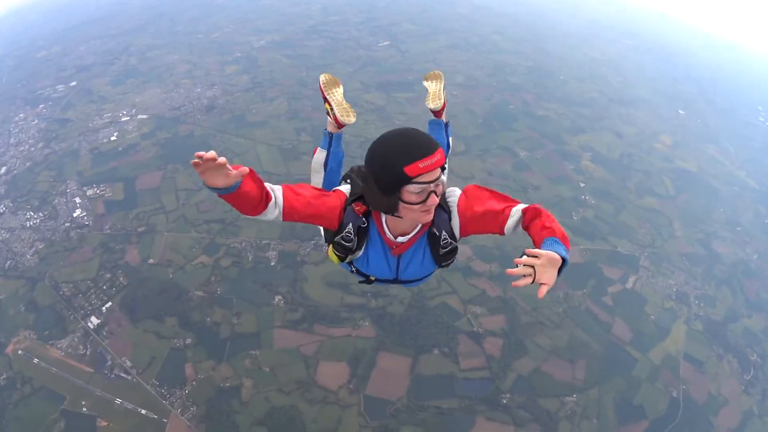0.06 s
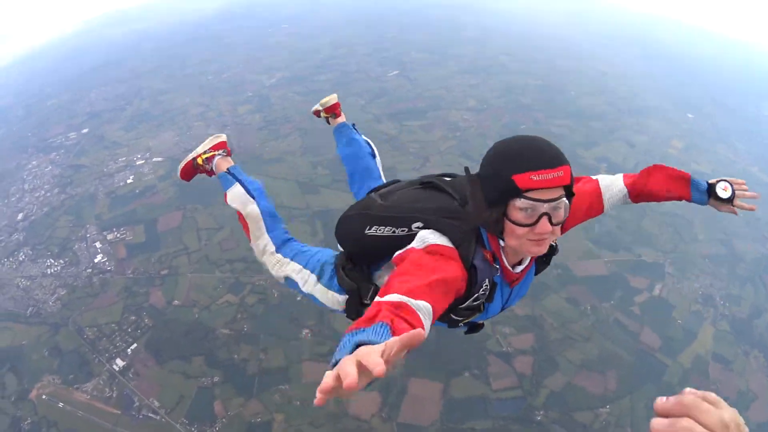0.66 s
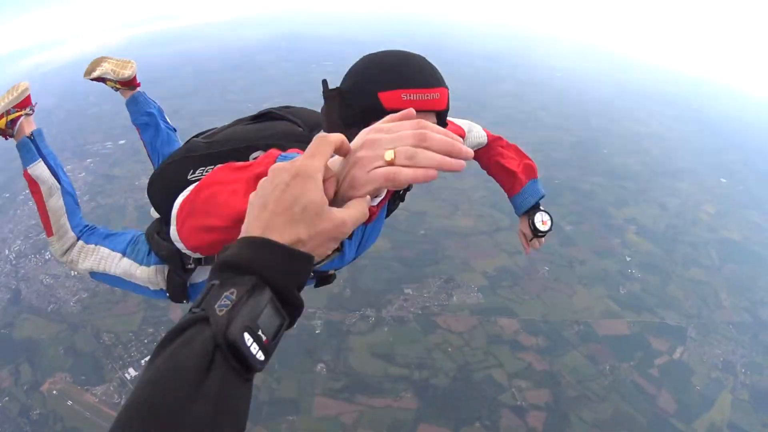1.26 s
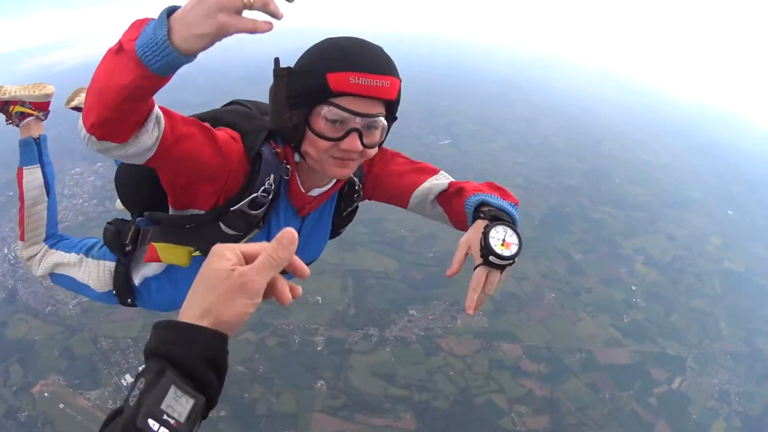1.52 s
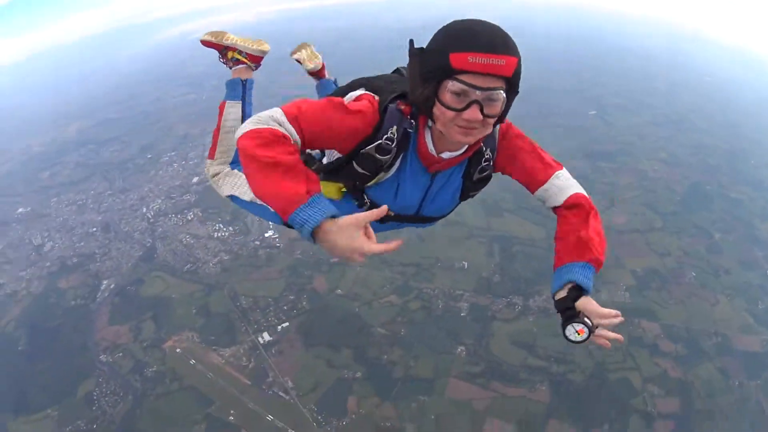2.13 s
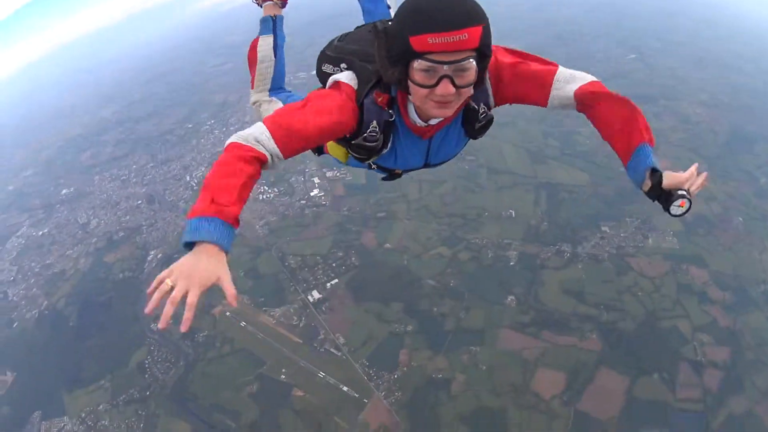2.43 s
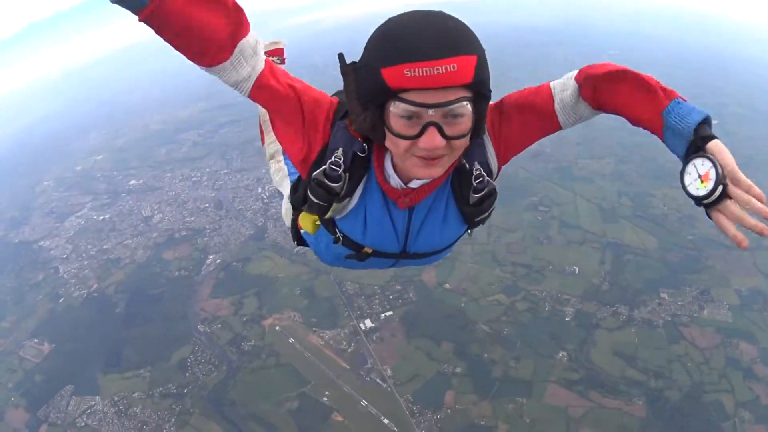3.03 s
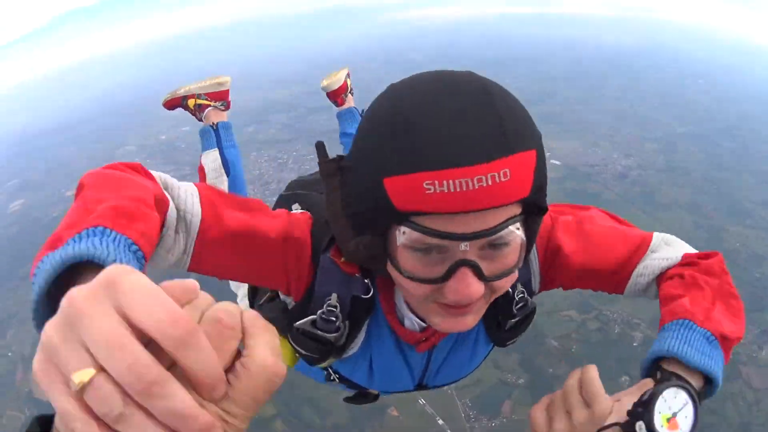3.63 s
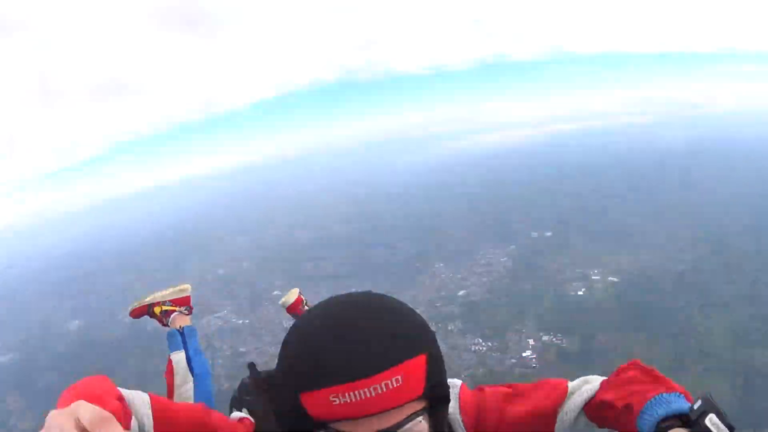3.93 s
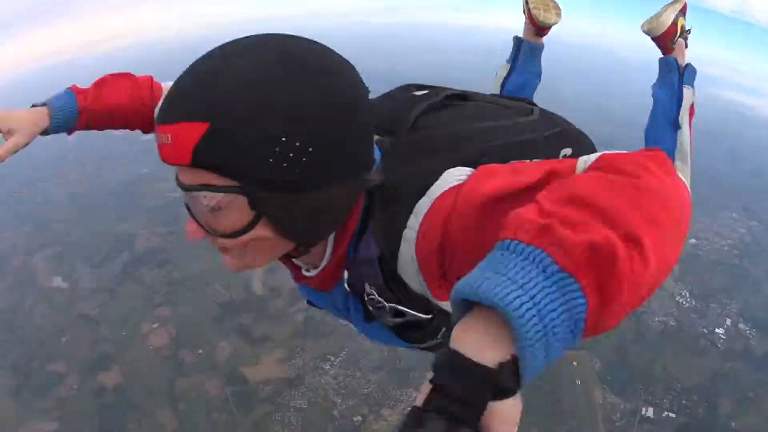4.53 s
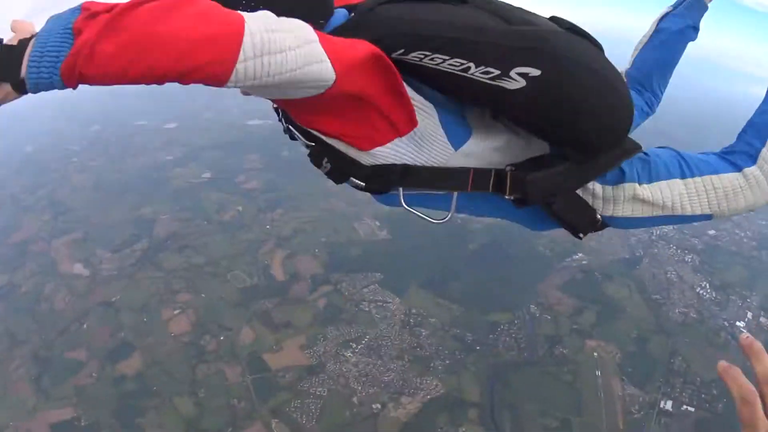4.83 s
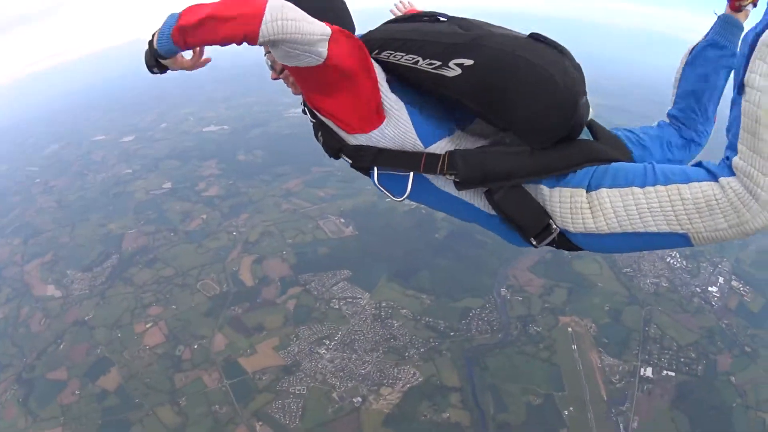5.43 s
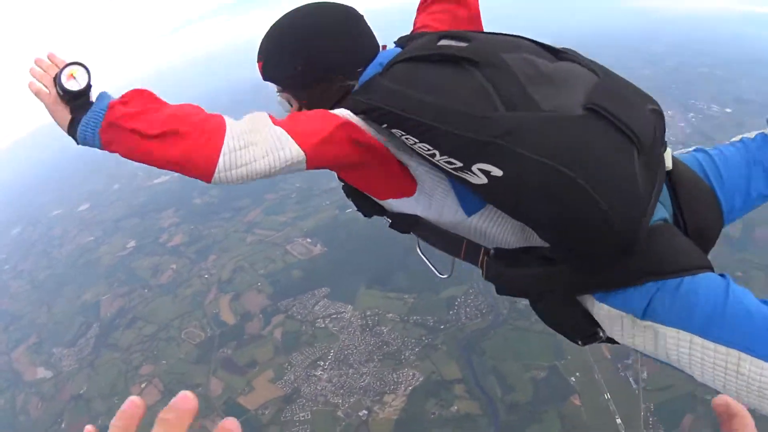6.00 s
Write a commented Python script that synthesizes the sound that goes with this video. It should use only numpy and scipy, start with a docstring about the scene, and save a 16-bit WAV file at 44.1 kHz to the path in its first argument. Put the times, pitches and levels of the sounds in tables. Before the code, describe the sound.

Air tears past a skydiver's microphone in a continuous blustering rush, with low rumble, sizzling hiss and short rasping flares.

```python
"""Freefall wind on a helmet camera

Air tears past two microphone ports. Large eddies roar nearly alike in both, smaller ones bluster.
A fluttering rush rings the hollows of the housing, the largest hollow howls, fine turbulence hisses.
Now and then the rush flares in a rasp or drops into a lull, an eddy buffets a port, or the stream spits."""
import sys
import numpy as np
from scipy import signal
from scipy.fft import rfft, irfft, next_fast_len
from scipy.io import wavfile
from scipy.ndimage import uniform_filter1d, map_coordinates

SR = 44100
rng = np.random.default_rng(int(sys.argv[2]) if len(sys.argv) > 2 else 0)


def put_to_file(sound):
    """Save the sound as 16-bit audio at rate SR, in the file named by the first command-line argument."""
    columns = np.atleast_2d(sound).T  # one column per channel
    safe = np.clip(columns, -1, 1)
    whole_steps = np.round(safe * 32767)
    wavfile.write(sys.argv[1], SR, whole_steps.astype(np.int16))


N = 276066
ATTACHED_DB = -17.5  # weaker flow starts to break up

# Spectra of rush and hiss. Each row: frequency in Hz, dB shared by the ports, dB opposed between them.
RUSH_SPECTRUM = [(200, -26, -28), (477, -7, -12), (830, -8, -8.5), (1530, -4.5, -3.5), (2350, 0.5, -4),
                 (3140, -0.5, -7.5), (3970, -4, -2.5), (4980, -11, -6), (6560, -22.5, -12),
                 (9000, -40.5, -33)]
HISS_SPECTRUM = [(200, -13, -22), (607, -10, -11), (1400, 4.5, -1.5), (2540, -11.5, -1.5),
                 (4020, -1.5, -0.5), (6000, -0.5, 8.5), (8100, -0.5, -1), (10460, 0.5, 8), (10500, 5.5, 11)]
# Flares of the rush; eddies hitting a port. Each row: crest in seconds, level in dB, half length in seconds.
RASP_EVENTS = [(.792, -20, 0.015), (1.127, -17, 0.0054), (1.361, -11.5, 0.0066), (1.391, -10, 0.0021),
               (1.414, -12.5, 0.0098), (1.53, -14.5, 0.0075), (1.584, -20, 0.0033), (1.615, -17.5, 0.0057),
               (1.864, -20, 0.011), (1.918, -15, 0.0039), (2.45, -18.5, 0.022), (2.555, -18, .012),
               (2.745, -15, .02), (3.163, -12, 0.0055), (3.522, -12.5, 0.0051), (3.587, -18.5, 0.0061),
               (3.861, -17, .003), (3.872, -15.5, .003), (4.034, -20, .004), (4.083, -15, 0.0044),
               (4.099, -15, 0.0034), (4.158, -22, .0026), (4.179, -18.5, 0.0059), (4.23, -15, .0039),
               (4.385, -17.5, 0.0074), (4.44, -12.5, 0.0047), (4.461, -20.5, .01), (4.636, -14.5, .0026),
               (5.055, -22, 0.0079), (5.124, -17, 0.0032), (5.236, -16, .0068), (5.489, -17, 0.0046),
               (5.846, -17, 0.012), (5.879, -14, 0.01), (6.138, -10, 0.004)]
BUFFET_EVENTS = [(1.064, -8.5, .0045), (1.21, -16.5, 0.0081), (1.287, -10, 0.0038), (1.408, -21, 0.0059),
                 (2.753, -21, 0.0065), (2.953, -13, .0045), (3.533, -13.5, 0.0033), (3.929, -8, .003),
                 (3.966, -9.5, .0013), (3.987, -15.5, 0.0039), (4.021, -8, 0.0055), (4.436, -17, .0042),
                 (6.15, -10, 0.0051)]


def amp(db):
    """Decibels to gain."""
    return 10 ** (np.asarray(db) / 20)


def curve(rows):
    """(seconds, value) rows joined by straight lines, one value per sample."""
    return np.interp(np.arange(N) / SR, *np.transpose(rows))


def log_interp(points_hz, values, hz):
    """Values joined by straight lines on a log-frequency axis."""
    return np.interp(np.log(hz + 1), np.log(points_hz), values)


def wobble(rate_hz):
    """Smooth random curve with knots at rate_hz."""
    knots = rng.standard_normal(int(N * rate_hz / SR) + 4)
    return map_coordinates(knots, [np.arange(N) * rate_hz / SR])


def bumps(rows):
    """Sum of steep-sided bumps."""
    t, total = np.arange(N) / SR, np.zeros(N)
    for crest_s, height, half_s in rows:
        near = slice(*np.searchsorted(t, [crest_s - 2 * half_s, crest_s + 2 * half_s]))
        total[near] += height * np.exp(-((t[near] - crest_s) / half_s) ** 4)
    return total


def swells(events):
    """Pressure envelope of passing eddies."""
    return bumps([(crest_s, amp(db), half_s) for crest_s, db, half_s in events])


def filtered(x, response):
    """Apply response(hz) to x."""
    size = next_fast_len(N + SR // 2)
    return irfft(rfft(x, size) * response(np.fft.rfftfreq(size, 1 / SR)), size)[..., :N]


def band_limit(hz, top_hz=11130):
    """Gain of the camera's steep low-pass."""
    return 1 / (1 + (hz / top_hz) ** 120)


def turbulence(spectrum, swirl_db=0):
    """Left and right pressure, rms 1: noise that swells with the swirl, coloured by the housing."""
    # Housing resonances. Each row: centre in Hz, width in Hz, shared lift in dB, opposed lift in dB.
    hollows = [(1310, 320, -2, 6.5), (1450, 195, 4.5, -1.5), (1898, 500, 5, -0.5), (2400, 130, 0.5, 3),
               (2720, 170, -0.5, -1.5), (3003, 170, -5.5, 3), (3410, 300, 1.5, 1.5), (3965, 290, 2, 2.5),
               (4530, 400, -1.5, -1), (5170, 1030, 4.5, 3.5)]
    points_hz, *parts_db = np.transpose(spectrum)

    def response(hz):
        slope_db = np.array([log_interp(points_hz, part, hz) for part in parts_db])
        lift_db = sum(np.outer(lifts_db, 1 / (1 + (2 * (hz - centre_hz) / width_hz) ** 2))
                      for centre_hz, width_hz, *lifts_db in hollows)
        return amp(slope_db + lift_db) * band_limit(hz)

    shared, opposed = filtered(rng.standard_normal((2, N)) * amp(swirl_db), response)
    ports = np.array([shared + opposed, shared - opposed])
    return ports / np.sqrt(np.mean(ports ** 2) + 1e-20)


def shreds(rate_hz, life_s, scatter_db, steady_power):
    """Gain of a stream torn into vortices that arrive abruptly and fade; few crackle, many blend."""
    arrivals = rng.random(N) < rate_hz / SR
    impulses = arrivals * amp(scatter_db * np.clip(rng.standard_normal(N), -2, 2)) ** 2
    age = np.arange(SR // 20) / SR / life_s
    power = np.abs(signal.fftconvolve(impulses, age * np.exp(-age))[:N])
    power = power / np.mean(power) + steady_power
    return np.sqrt(power / uniform_filter1d(power, size=4000))  # vortices share the stream's energy


def roar(level_db, lead_s=0.00024, deep_hz=80):
    """Large eddies press on both ports, the right one first; the deepest rumble builds up at the start."""
    # Each row: frequency in Hz, shared level in dB, opposed level in dB.
    spectrum = [(20, -22, -32), (35, -15, -27), (60, -6.5, -25), (104, -2, -19.5), (230, -1.5, -12.5),
                (375, -4, -11), (660, -16, -12), (1200, -40, -34), (3000, -51, -62)]
    eddies = turbulence(spectrum, 1.3 * wobble(45))
    eddies = filtered(eddies, lambda hz: np.exp(1j * np.pi * lead_s * np.outer([-1, 1], hz)))
    deep = filtered(eddies, lambda hz: 1 / (1 + (hz / deep_hz) ** 4))
    held_back = curve([(0, 0.79), (0.9, 0.13)])
    return amp(level_db) * (eddies - deep * held_back)


def bluster(flow_db, stir_db):
    """Camera-sized eddies strike each port separately; they grow with the roar and fade in a wake."""
    # Each row: frequency in Hz, shared level in dB, opposed level in dB.
    spectrum = [(100, -31, -20), (453, 4, -8), (704, -1, 6), (960, 2.5, -5), (1290, 0, -1),
                (2000, -11, -17), (4000, -8.5, -27)]
    level_db = -26.5 + 0.99 * np.minimum(flow_db - ATTACHED_DB, 0) + 0.45 * stir_db
    return amp(level_db) * turbulence(spectrum, 1.3 * wobble(45) + 1.2 * wobble(200))


def rush(flow_db, wake, gain_db=-0.28):
    """Air peels off the housing in shreds, sparser in a wake."""
    flutter = shreds(rate_hz=380 * amp(-11 * wake), life_s=0.00037, scatter_db=0.5, steady_power=0.61)
    return amp(flow_db + gain_db) * turbulence(RUSH_SPECTRUM, 2.2 * wobble(70)) * flutter


def howl(flow_db, wake, wake_loss_db=2):
    """Attached flow sounds the largest hollow like a blown bottle; a wake starves it."""
    # Each row: frequency in Hz, shared level in dB, opposed level in dB.
    spectrum = [(700, -45, -50), (1500, -22, -32), (1710, -9, -22), (1810, 0, -15), (1930, -.5, -15),
                (2090, -9, -22), (2400, -21, -32), (5000, -50, -55)]
    level_db = -15 + 0.64 * flow_db - wake_loss_db * wake
    return amp(level_db) * turbulence(spectrum, 1.5 * wobble(25) + 1.3 * wobble(110))


def hiss(flow_db, stir_db, wake, knee_db=-18.5):
    """Fine turbulence sizzles at the ports, most at a middling flow, and sputters in a wake."""
    # Hiss at the knee. Each row: time in seconds, level in dB.
    knee_levels = [(0, -20.7), (1.2, -19.8), (2.25, -19.8), (2.45, -21.5), (4.8, -21.5), (5.15, -23.5),
                   (5.65, -20.5), (6.26, -22.5)]
    slow_loss_db = 0.088 * np.maximum(knee_db - flow_db, 0)
    fast_loss_db = 0.42 * np.maximum(flow_db - knee_db, 0)  # a fast stream skips over the ports
    level_db = curve(knee_levels) - slow_loss_db - fast_loss_db + 0.28 * stir_db
    sputter = shreds(rate_hz=800 * amp(-24 * wake), life_s=0.0004, scatter_db=2.8, steady_power=0.55)
    return amp(level_db) * turbulence(HISS_SPECTRUM, 0.86 * wobble(50) + 0.5 * wobble(5.1)) * sputter


def stalls(wake, ahead_s=0.0017, half_s=0.0018, depth_db=3, wake_depth_db=5):
    """Gain of the stream as it stalls just before each rasp or buffet, more deeply in a wake."""
    pauses = bumps([(crest_s - rise_s - ahead_s, 1, half_s)
                    for crest_s, _, rise_s in [*RASP_EVENTS, *BUFFET_EVENTS]])
    return amp(-np.minimum(pauses, 1) * (depth_db + wake_depth_db * wake))


def rasps(gain_db=1.5):
    """The rush flares briefly."""
    return amp(gain_db) * swells(RASP_EVENTS) * turbulence(RUSH_SPECTRUM)


def lulls():
    """Gains of stream and hiss as the air lifts off the housing; the hiss may dip or rise."""
    # Each row: centre in seconds, stream drop in dB, hiss drop in dB, half length in seconds.
    lift_offs = [(.945, 2, -4, 0.02), (1.455, 3, -2.5, 0.029), (1.6, 4, 2, 0.028), (1.826, 6, 5, 0.016),
                 (1.948, 3, 3, 0.018), (2.796, 6.5, -2.5, 0.023), (3.005, 4.5, -2, 0.028),
                 (3.886, 4, 8, 0.01), (3.961, 4, 14, 0.019), (4.053, 5, 4, 0.012), (4.12, 6, 11, 0.038),
                 (5.452, 4, -1, 0.035), (6.187, 3, 2, 0.031)]
    stream_drop_db = bumps([(at_s, db, half_s) for at_s, db, _, half_s in lift_offs])
    hiss_drop_db = bumps([(at_s, db, half_s) for at_s, _, db, half_s in lift_offs])
    return amp(-stream_drop_db), amp(-hiss_drop_db)


def buffets():
    """An eddy hitting a port head-on gives a hoarse thump, different in each ear."""
    # Each row: frequency in Hz, shared level in dB, opposed level in dB.
    spectrum = [(60, -14, -22), (200, -6, -7), (550, -6, 0), (1100, -7, -1.5), (2000, -10, -9),
                (5000, -12, -9), (8000, -19, -17), (11000, -19, -16)]
    return swells(BUFFET_EVENTS) * turbulence(spectrum)


def spits(wake, breakaway=0.37, max_rate_hz=110, level_db=-14, half_s=0.0008):
    """A stream that has broken away snaps back onto the ports at random instants."""
    broken = np.clip(wake / breakaway - 1, 0, 1)
    hits = np.flatnonzero(rng.random(N) < max_rate_hz * broken / SR)
    scatter_db = 2 * rng.standard_normal(N)
    return swells([(i / SR, level_db + scatter_db[i], half_s) for i in hits]) * turbulence(HISS_SPECTRUM)


def scene(gust_db=1.03, wake_span_db=16.5):
    """The flow and the large eddies drive the wind, heard through two ports of unequal colour."""
    # Stream strength, low in the wake of a hand or body. Each row: time in seconds, level in dB.
    flow_levels = [(0, -18), (.58, -18.5), (.72, -13.5), (.97, -16.5), (1.36, -18.5), (1.6, -21.5),
                   (1.8, -26), (1.98, -22), (2.14, -15), (2.3, -17.5), (2.91, -13), (3.4, -19.5),
                   (3.52, -17), (3.66, -23.5), (4.36, -24.5), (4.46, -19.5), (4.6, -22.5), (4.88, -17),
                   (5.25, -17.5), (5.4, -23), (5.55, -19.5), (6.12, -17), (6.26, -16)]
    # Large-eddy strength. Each row: time in seconds, level in dB.
    roar_levels = [(0, -30), (.45, -26.5), (.9, -25.5), (1.28, -21), (1.47, -26), (1.79, -24),
                   (2.12, -25.5), (2.25, -28), (2.45, -26.5), (2.63, -28), (2.95, -25), (4.0, -24.5),
                   (4.1, -30), (4.28, -22), (4.45, -25), (5.6, -25), (6.26, -24.5)]
    # Port imbalance. Each row: frequency in Hz, left minus right in dB.
    balance = [(200, -0.5), (900, 0.9), (1350, -0.5), (1900, -3), (2500, -1), (3400, 0), (4000, -1),
               (4350, 0.5), (5000, -2.5), (6800, -0.5), (9200, -0.5), (10500, 0)]
    flow_db, roar_db = curve(flow_levels), curve(roar_levels)
    stir_db = roar_db - roar_db.mean()
    wake = np.clip((ATTACHED_DB - flow_db) / wake_span_db, 0, 1)  # 0 attached, 1 all wake
    gusty_db = flow_db + gust_db * wobble(26)
    stream_lull, hiss_lull = lulls()
    stream = stalls(wake) * (bluster(flow_db, stir_db) + rush(gusty_db, wake)) + howl(gusty_db, wake)
    sizzle = hiss_lull * hiss(flow_db, stir_db, wake) + spits(wake)
    wind = roar(roar_db) + stream_lull * stream + sizzle + buffets() + rasps()
    return filtered(wind, lambda hz: amp(np.outer([0.5, -0.5], log_interp(*np.transpose(balance), hz))))


def record(dry, ceiling=0.92, hardness=5):
    """The camera rounds off the tallest peaks and keeps nothing above its band limit."""
    rounded = dry / (1 + np.abs(dry / ceiling) ** hardness) ** (1 / hardness)
    return filtered(rounded, band_limit)


dry = scene()
out = record(dry)
put_to_file(out)
```